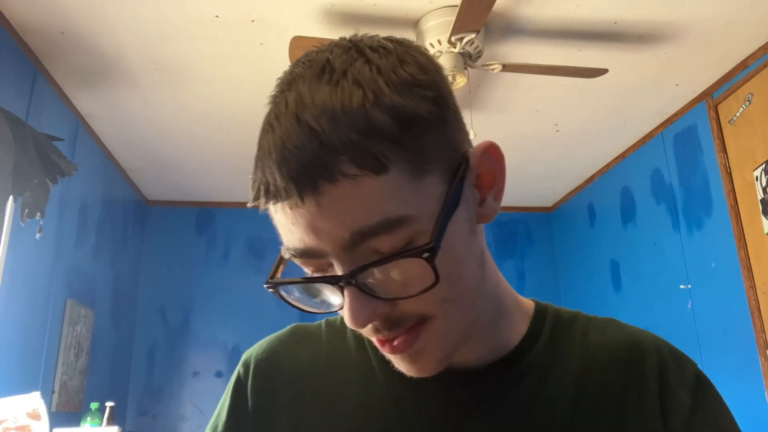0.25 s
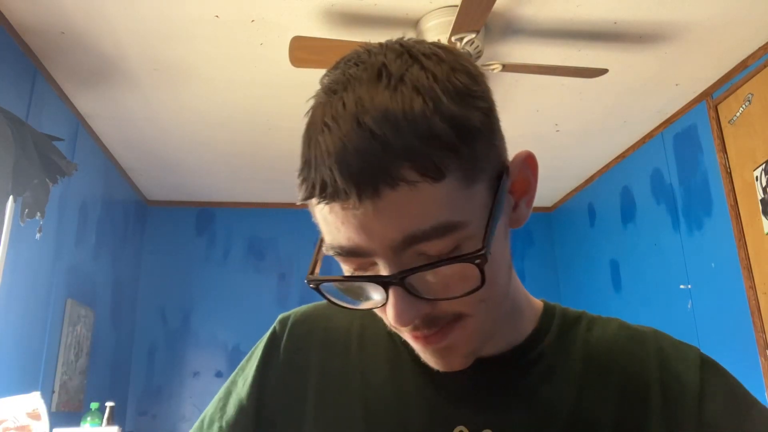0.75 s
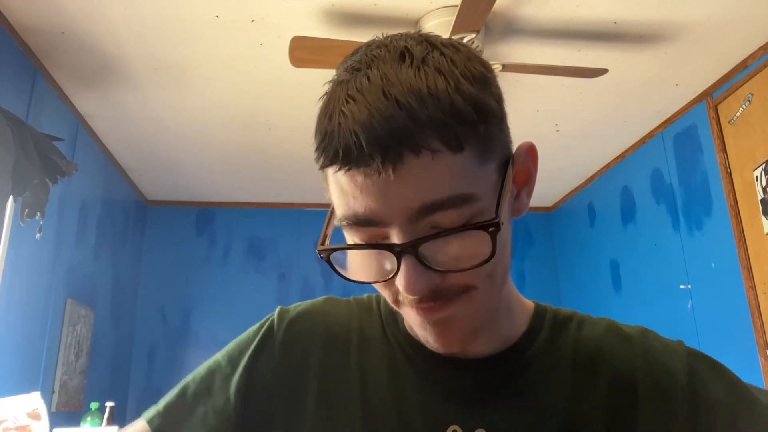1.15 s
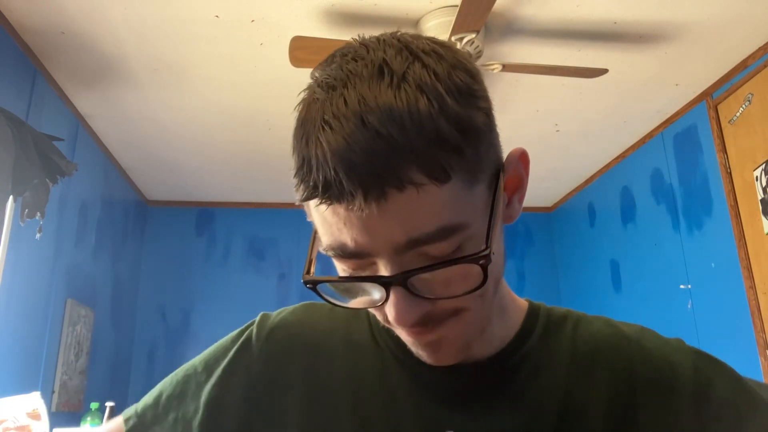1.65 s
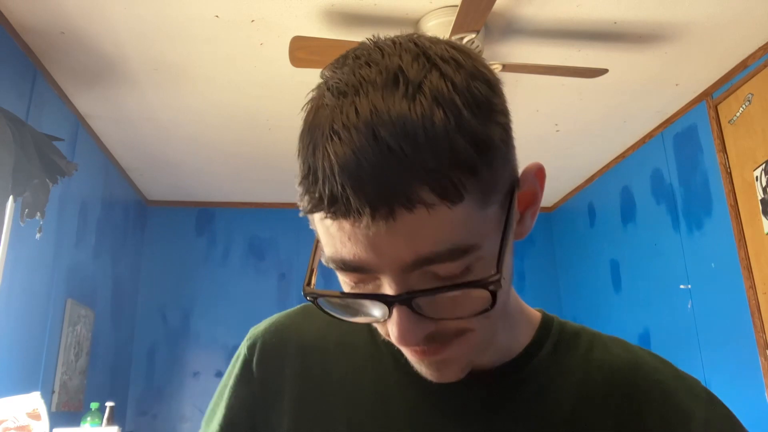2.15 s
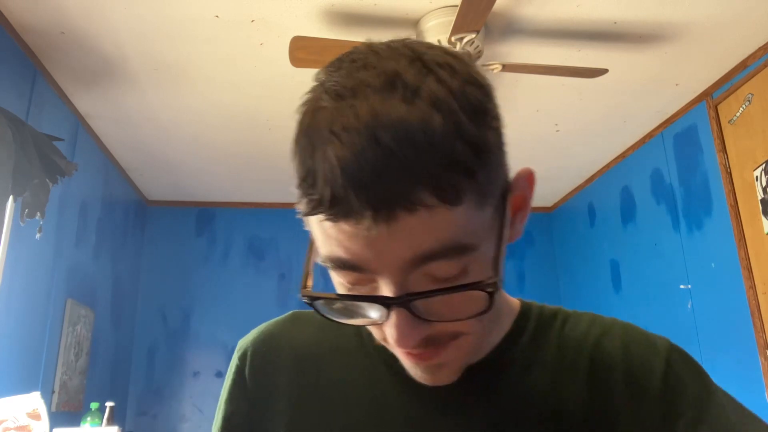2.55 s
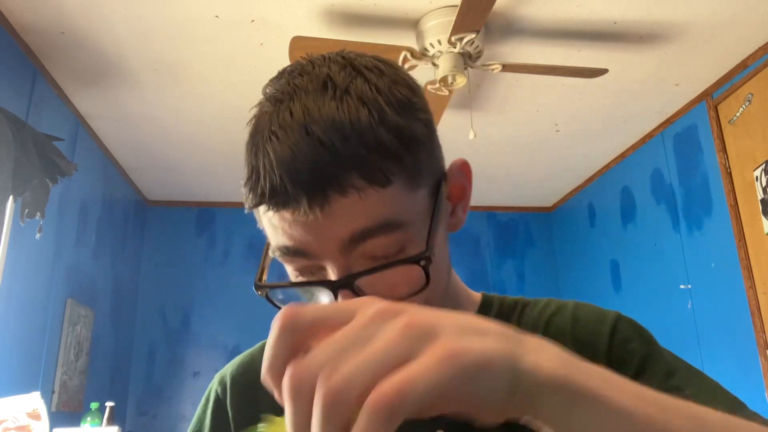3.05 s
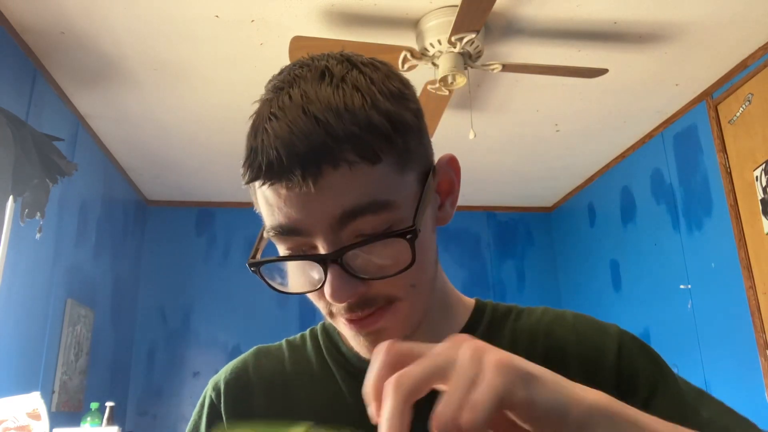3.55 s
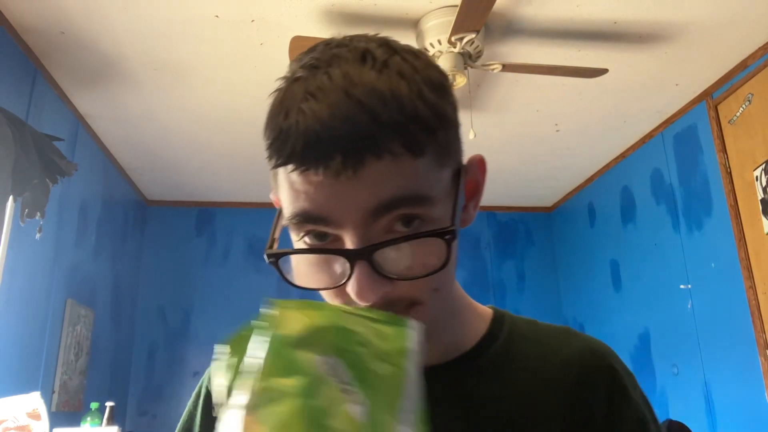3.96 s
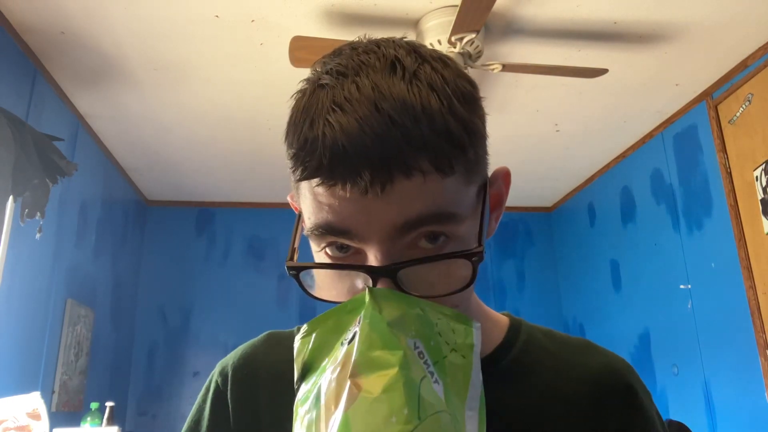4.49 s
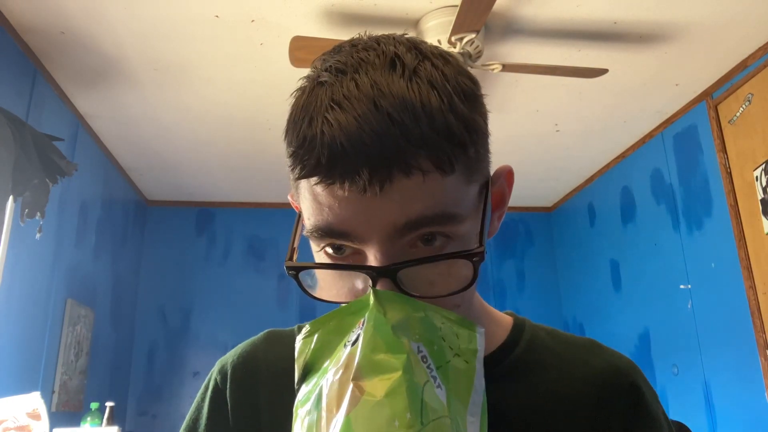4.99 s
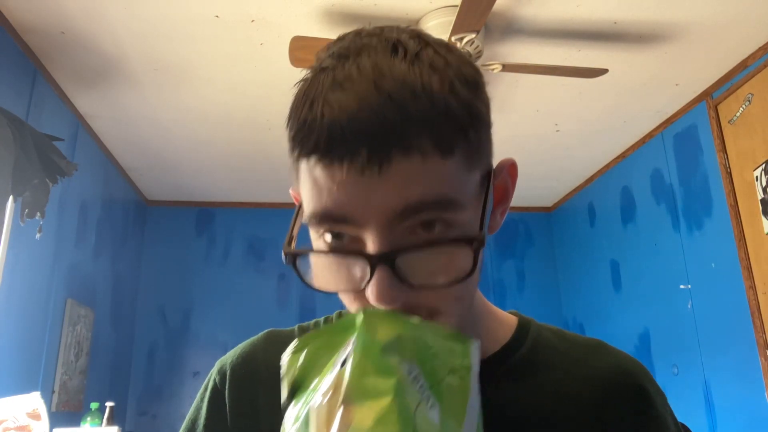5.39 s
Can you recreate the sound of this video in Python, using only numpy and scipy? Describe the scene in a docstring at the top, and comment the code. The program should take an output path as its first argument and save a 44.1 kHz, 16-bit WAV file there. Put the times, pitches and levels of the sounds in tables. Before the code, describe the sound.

Bright, loud plastic crinkling starts at once and comes in quick pulses, peaking before two seconds with snaps, rasps and a short run of peeling ticks. Softer, hollower rustles and low air puffs follow as the bag goes slack, then one last loud crunch and small clicks. The close pickup catches short room reflections; faint room air and a wavering low hum continue to the end.

```python
"""A low drone and faint air fill a small bedroom as a plastic snack bag is pulled taut close by.
From the first grip its stiff film crinkles in swarms of tiny clicks, and the room briefly rings.
Puffs of air, loud snaps with hollow pops, and rasps of slipping film soon join in.
Near one second the seam peels in runs of dry ticks; later the bag is turned over slack and lifted.
Random clicks are shaped by the film's spectrum; the puffs, air and rumble are filtered noise."""
import sys
import numpy as np
from scipy import signal
from scipy.fft import rfft, irfft
from scipy.io import wavfile
from scipy.ndimage import uniform_filter1d

SR = 44100
rng = np.random.default_rng(int(sys.argv[2]) if len(sys.argv) > 2 else 0)


def file_out(sig):
    """Save sig as 16-bit WAV at sys.argv[1]."""
    # one column per channel
    cols = np.atleast_2d(sig).T
    # limit, then scale
    lim = np.clip(cols, -1, 1)
    pcm = np.round(lim * 32767).astype(np.int16)
    wavfile.write(sys.argv[1], SR, pcm)


N = 248322
TIME = np.arange(N) / SR  # s
BINS = np.fft.rfftfreq(4096, 1 / SR)  # frequencies at which spectra are drawn, Hz


def amp(db):
    """Turns decibels into gain."""
    return 10 ** (np.asarray(db) / 20)


def unit_rms(x):
    """Scales a sound to rms 1."""
    return x / np.sqrt(np.mean(x ** 2) + 1e-20)


def unit_energy(x):
    """Scales a sound to energy 1."""
    return x / np.sqrt(np.sum(x ** 2) + 1e-20)


def read(points, hz):
    """Reads between the points of a table on a log-frequency axis."""
    f, value = np.transpose(points)
    return np.interp(np.log(hz + 1), np.log(f), value)


def add(mix, s, sound):
    """Mixes a sound in at time s, in seconds."""
    start = max(round(s * SR), 0)
    part = mix[start:][:len(sound)]
    part += sound[:len(part)]


def causal(db):
    """Makes the sharpest impulse response with this spectrum (minimum phase), of energy 1."""
    log_gain = np.log(amp(np.maximum(db, db.max() - 100)))
    circle = np.concatenate([log_gain, log_gain[-2:0:-1]])  # add the mirrored negative frequencies
    minimum_phase = np.exp(np.conj(signal.hilbert(circle)))
    return unit_energy(np.fft.ifft(minimum_phase).real[:len(BINS)])


def bump(hz, width, lift_db):
    """Draws one resonance as a lift in dB."""
    return lift_db / (1 + (2 * (BINS - hz) / width) ** 2)


def band(low_hz, high_hz, order=3):
    """Draws a pass band in dB."""
    below = 1 + (low_hz / (BINS + 1)) ** (2 * order)
    above = 1 + (BINS / high_hz) ** (2 * order)
    return -10 * np.log10(below * above)


def background(drone_hz=71, waver_hz=4, rumble_db=-6, air_db=-59):
    """Filtered noise makes faint, even room air; a wavering sine in a little rumble makes the drone."""
    # still room air: (f/Hz, relative level/dB)
    air_colour = [(25, -18), (45, -4.5), (75, -10), (125, -8.5), (190, -22), (350, -16.5), (520, -26.5),
                  (1230, -29), (1600, -33), (4300, -40), (5100, -31.5), (6100, -41.5), (8200, -43.5),
                  (10800, -41), (13500, -46), (16000, -45.5)]
    # the drone's rise and fall: (t/s, level/dB)
    drone_levels = [(0, -46.5), (2.4, -53), (3.3, -54), (3.9, -49.5), (4.5, -47.5), (4.85, -58), (5.1, -51),
                    (5.3, -46.5), (5.63, -45.5)]
    hz = np.fft.rfftfreq(N, 1 / SR)
    air = rfft(rng.standard_normal(N)) * amp(read(air_colour, hz))
    air = irfft(air, N) / np.std(irfft(air * (hz > 200), N))  # air_db is its level above 200 Hz

    waver = unit_rms(irfft(rfft(rng.standard_normal(N)) * (hz < 8), N))
    pitch = drone_hz + waver_hz * waver
    tone = unit_rms(np.sin(2 * np.pi * np.cumsum(pitch) / SR))
    rumble = rfft(rng.standard_normal(N)) / (1 + ((hz - drone_hz) / 15) ** 4)
    drone = unit_rms(tone + amp(rumble_db) * unit_rms(irfft(rumble, N)))
    drone_db = np.interp(TIME, *np.transpose(drone_levels))
    return amp(air_db) * air + amp(drone_db) * drone


def hands(t, rest_db=-81, release_db_per_s=211.5, release_per_taut_db=0.43, flap_db=-6,
          flap_per_taut_db=-0.52):
    """Gives levels in dB of creases, panels and wall as each grip tightens, holds and lets go."""
    # pulls and squeezes, crisp if taut and hollow if slack:
    # (start t/s, rise/s, hold/s, panel level/dB, tautness/dB)
    grips = [(0.0, 0.0017, 0.033, -27.5, 0), (0.046, 0.025, 0.053, -37.5, 2),
             (0.169, 0.065, 0.058, -34, 2.5), (0.251, 0.068, 0.063, -22.5, 4),
             (0.376, 0.021, 0.062, -22.5, 2), (0.483, 0.042, 0.047, -27.5, 2),
             (0.612, 0.021, 0.044, -25.5, 1.5), (0.704, 0.042, 0.081, -23, 5),
             (0.833, 0.029, 0.034, -21, 4.5), (0.926, 0.04, 0.027, -23, 4), (1.027, 0.014, 0.03, -28.5, 4),
             (1.1, 0.028, 0.046, -28.5, 5), (1.207, .012, 0.04, -24, 6), (1.283, 0.1, 0.016, -19, 6),
             (1.383, 0.041, .04, -22.5, 10.5), (1.472, 0.024, 0.078, -24.5, 6.5),
             (1.575, 0.027, 0.047, -19, 4.5), (1.738, 0.047, 0.027, -20, 6.5),
             (1.801, 0.015, 0.0075, -16.5, -2), (1.934, 0.036, 0.038, -31, -0.5),
             (2.055, 0.024, 0.068, -32.5, -3), (2.245, 0.018, 0.016, -41.5, -8),
             (2.439, 0.029, 0.041, -39, -4), (2.498, 0.023, 0.06, -27, -2), (2.79, 0.023, 0.022, -43, -6.5),
             (2.869, 0.034, 0.12, -43, 0.5), (3.017, 0.035, 0.039, -34.5, -4),
             (3.226, .015, 0.046, -51.5, 1.5), (3.375, 0.019, 0.07, -35, -5),
             (3.466, 0.024, 0.022, -18.5, -0.5), (3.575, 0.021, 0.02, -49, 1),
             (3.758, 0.012, 0.015, -35, -5), (3.84, 0.022, 0.099, -53.5, 2.5), (4, 0.02, 0.028, -53.5, -2),
             (4.195, 0.035, 0.021, -45, -2.5), (4.875, .012, 0.013, -57, -4), (4.955, .02, .03, -61.5, -2)]
    power = amp(rest_db) ** 2  # the bag held still
    for start, rise, hold, db, taut in grips:
        tighten = np.clip((t - start) / rise, 0, 1)
        # taut film stops at once, slack film goes on settling
        fall_db_per_s = release_db_per_s * amp(release_per_taut_db * taut)
        let_go = amp(-fall_db_per_s * np.maximum(t - start - rise - hold, 0))
        wall_db = db + flap_db + flap_per_taut_db * taut  # the wall flaps less the tauter it is
        shares = amp([db + taut, db, wall_db])
        power = power + np.outer(shares, tighten * let_go) ** 2
    return 10 * np.log10(power)


def bag_voices(ring=1, flap_hz=520, crease_hz=3400, lowest_hz=200):
    """Gives spectra of small creases, middling panels and the whole flapping wall."""
    # colour of the film: (f/Hz, relative level/dB)
    film_colour = [(60, -4.5), (150, -0.5), (210, -8), (300, 1.5), (520, 3.5), (720, -1.5), (1500, -2),
                   (2100, -2.5), (3800, 3.5), (5200, 2.5), (7000, 2.5), (9700, 4.5), (11200, -0.5),
                   (13400, -7), (15500, -3)]
    # resonances of the hollow bag: (f/Hz, width/Hz, lift before the ring factor/dB)
    hollow_modes = [(386, 53, 2.5), (951, 150, 10), (1275, 80, 4), (1660, 160, 0), (2450, 120, -0.5)]
    colour = read(film_colour, BINS) + ring * sum(bump(*mode) for mode in hollow_modes)
    crease = colour + band(crease_hz, SR)
    panel = colour + band(flap_hz, crease_hz)
    wall = colour + band(lowest_hz, flap_hz)
    return [crease, panel, wall]


def facet(spread_db, size=110):
    """Gives one facet of film its own chance peaks and dips, smoothed over size bins."""
    noise = rng.standard_normal(len(BINS) + size - 1)
    ripple = signal.fftconvolve(noise, np.hanning(size), "valid")
    return spread_db * unit_rms(ripple)


def swarm_of_clicks(t, per_s, spread_db, facet_db, count=24):
    """Makes uneven clicks; a fold travels, so neighbouring clicks come from neighbouring facets."""
    loudness = amp(spread_db * np.minimum(rng.exponential(1, len(t)), 3))
    sizes = loudness * rng.choice([-1, 1], len(t))
    clicks = sizes * (rng.random(len(t)) < per_s / SR)
    # the fold crosses 110 facets a second, with some scatter
    which = (t * 110 + rng.uniform(0, 6, len(t))).astype(int) % count
    swarm = np.zeros(len(t))
    for k in range(count):
        swarm += signal.oaconvolve(clicks * (which == k), causal(facet(facet_db)))[:len(t)]
    return unit_rms(swarm)


def buckling(t, per_s, spread_db, slide, slips_per_s=190, slip_s=0.00043, clump=0.43):
    """Bunches clicks and sliding hiss: tension builds, the film slips, and tension builds again."""
    swarm = swarm_of_clicks(t, per_s, spread_db, facet_db=4.5) + slide * rng.standard_normal(len(t))
    wait, size = rng.uniform(.25, 1.75, (len(t) // 20, 2)).T
    at = (np.cumsum(wait) / slips_per_s * SR).astype(int)
    slips = np.bincount(at, size, len(t))[:len(t)]
    fading_slips = signal.lfilter([1], [1, -np.exp(-1 / (slip_s * SR))], slips)
    swarm = swarm * (1 + clump * fading_slips)
    return swarm / np.sqrt(uniform_filter1d(swarm ** 2, size=1000))  # the hand feeds in energy steadily


def crinkle(per_s=1500, idle_per_s=900, trims_db=(0, -.6, -.3)):
    """Makes more creases give way each second the harder the hands work."""
    coarse = TIME[::40]
    levels = [np.interp(TIME, coarse, level) for level in hands(coarse)]
    rate = idle_per_s + per_s * amp(.8 * (levels[0] + 20))
    swarm = buckling(TIME, rate, spread_db=2.5, slide=0.26)
    out = 0
    for db, trim, colour in zip(levels, trims_db, bag_voices()):
        out = out + signal.oaconvolve(swarm * amp(db + trim), causal(colour))
    return out


def echoes(near_db=-13, tail_db=-7.5):
    """Makes a few reflections from body and desk, then a diffuse tail that dies fastest at the top."""
    # room decay: (f/Hz, time to fall 60 dB/s)
    room_decay = [(150, 0.58), (600, 0.26), (1800, 0.36), (5000, 0.34), (10000, 0.27), (16000, 0.043)]
    t = np.arange(SR // 2) / SR
    near = np.zeros(len(t))
    near[(rng.uniform(.002, .014, 9) * SR).astype(int)] = rng.choice([-1, 1], 9)

    hz, when, z = signal.stft(rng.standard_normal(len(t)), SR, nperseg=256)
    decay = amp(-60 * when / read(room_decay, hz)[:, None])
    tail = signal.istft(z * decay, SR, nperseg=256)[1][:len(t)]
    tail = unit_energy(tail * np.clip((t - .003) / 0.0009, 0, 1))  # starts after 3 ms
    return amp(near_db) * unit_energy(near) + amp(tail_db) * tail


def bedroom(x, boom_hz=157, boom_width_hz=10, count=8):
    """Shifts the echo pattern as the bag moves; one standing wave booms between the walls."""
    place = TIME * 30  # 30 steps a second round the ring of echo patterns
    wet = np.zeros(N)
    for k in range(count):
        away = np.minimum(abs((place - k + count / 2) % count - count / 2), 1)
        crossfade = np.cos(np.pi / 2 * away)
        wet += signal.fftconvolve(x * crossfade, echoes())[:N]
    boom = signal.lfilter(*signal.iirpeak(boom_hz, boom_hz / boom_width_hz, SR), x)
    return x + wet + boom


def swell(drive, colour):
    """Passes a drive through a spectrum, rising and falling once."""
    rung = signal.fftconvolve(drive, causal(colour))[:len(drive)]
    return unit_rms(rung) * signal.windows.tukey(len(drive), .6)


def puffs(low_hz=55, high_hz=125):
    """Pushes out air as the wall collapses: short swells of low noise."""
    # puffs as the bag gives way: (t/s, length/s, level before fading in and out/dB)
    puff_table = [(0.04, 0.098, -34), (1.59, 0.054, -38.5), (1.80, 0.071, -35), (2.11, 0.055, -39),
                  (2.52, 0.054, -36), (2.89, 0.12, -45.5), (3.04, 0.076, -40.5), (3.395, 0.074, -39.5),
                  (3.483, 0.048, -32)]
    out = np.zeros(N)
    for s, length, db in puff_table:
        air = rng.standard_normal(round(length * SR))
        add(out, s, amp(db) * swell(air, band(low_hz, high_hz)))
    return out


def small_snaps(shift_db=-4, spread_db=4, loudest_db=-23, low_hz=950, high_hz=2600, count=120):
    """Flips lesser creases at chance moments, about as loud as the crinkle around them."""
    chance = rng.random((count, 5))
    s = (np.arange(count) + chance[:, 0]) / count * TIME[-1]
    levels = np.minimum(hands(s).T + shift_db, loudest_db)
    levels = levels + spread_db * (2 * chance[:, 2:] - 1)
    pitches = low_hz * (high_hz / low_hz) ** chance[:, 1]
    return list(zip(s, *levels.T, pitches))


def aftershocks(decay_s, main, count=110):
    """Makes a main click, 0.5 ms in, amid the fading run of clicks in the film around it."""
    burst = np.zeros(SR // 30)
    late = rng.uniform(0, 4, count)
    at = np.minimum(late * decay_s * SR, len(burst) - 1).astype(int)
    burst[at] = rng.choice([-1, 1], count) * np.exp(-late)
    burst = unit_energy(burst)
    burst[SR // 2000] += main
    return burst


def snaps(thud_trim_db=-1, tick_hz=5500, pop_width=0.28, pop_lift_db=3.5):
    """Flips a crease with a bright tick; its panel pops at its own pitch, and the bag wall thuds."""
    # single creases snapping through, levels over 10 ms:
    # (t/s, tick level/dB, panel pop level/dB, wall thud level before its trim/dB, panel pitch f/Hz)
    snap_table = [(0.072, -17.5, -25.5, -32, 1500), (0.1516, -24, -31.5, -49, 1040),
                  (0.1548, -24.5, -29, -36.5, 1050), (0.4017, -20.5, -19.5, -34, 1510),
                  (0.5952, -21, -23, -31.5, 1820), (0.6296, -26, -28.5, -31, 1400),
                  (0.7601, -16.5, -24, -21, 1590), (0.789, -31, -23.5, -42, 1390),
                  (0.9357, -16, -20.5, -32, 1740), (0.9524, -19, -24.5, -24, 2030),
                  (1.0383, -25, -28, -48, 1520), (1.1128, -24, -32, -35, 1500),
                  (1.2135, -18.5, -21.5, -37, 1100), (1.3054, -24, -31, -40.5, 1750),
                  (1.5682, -15, -16.5, -25.5, 1220), (1.6128, -31, -16, -23.5, 1160),
                  (1.7596, -19.5, -37, -33, 2160), (1.8473, -20, -18.5, -24.5, 1030),
                  (1.9136, -25, -47, -54, 1560), (1.9216, -23.5, -26, -55, 1900),
                  (2.0203, -25.5, -45, -34, 1660), (2.1273, -22.5, -31.5, -32.5, 1190),
                  (2.1313, -20, -32, -27, 1540), (2.263, -35, -32.5, -33.5, 1020),
                  (2.4128, -53, -43, -41, 1380), (2.5149, -30, -27, -27, 1040),
                  (2.5426, -23.5, -21.5, -41, 1440), (2.594, -21.5, -21, -27.5, 1230),
                  (2.7155, -34.5, -38, -54, 1300), (2.7555, -44, -39.5, -39, 990),
                  (2.789, -36.5, -30.5, -32, 1060), (2.9037, -38, -33.5, -33, 1410),
                  (2.9794, -42.5, -35, -35, 1070), (3.0311, -53, -35.5, -30, 885),
                  (3.061, -33, -33, -38, 920), (3.0871, -27, -24, -30, 1810),
                  (3.1717, -47, -36, -43.5, 1160), (3.3074, -61, -40, -68, 1470),
                  (3.3817, -40, -40, -58, 1220), (3.3943, -33.5, -33.5, -38, 900),
                  (3.4164, -23.5, -25.5, -31, 1310), (3.4595, -21, -20, -34, 1590),
                  (3.4801, -22, -19.5, -28, 1440), (3.5378, -32, -19, -28, 1030),
                  (3.6407, -36, -29.5, -50, 1040), (3.6892, -57, -27, -39, 940),
                  (3.7492, -58, -36.5, -46, 1080), (3.8581, -41, -39, -53, 1580),
                  (3.9296, -41, -36, -52, 2240), (4.0172, -56, -43, -41, 1400),
                  (4.0316, -51, -41, -47.5, 1450), (4.0616, -49, -34, -50, 1230),
                  (4.1105, -62, -47, -55, 1005), (4.199, -42.5, -56, -62, 1870),
                  (4.2213, -33.5, -39, -67, 1500), (4.2264, -35.5, -32, -50, 1300),
                  (4.2392, -53, -36.5, -42, 1200), (4.3237, -32, -47, -60, 2646),
                  (5.4991, -63.5, -62, -63, 1353)]
    out = np.zeros(N)
    crease, panel, wall = bag_voices(ring=0.93)
    for s, tick, pop, thud, hz in list(snap_table) + small_snaps():
        # the resonance width is a share of the pitch
        pitch = bump(hz, pop_width * hz, pop_lift_db) + band(hz / 2.5, hz * 1.68, order=2)
        bright = crease + facet(0.53) + band(tick_hz, SR, order=1)
        parts = [(tick, bright, aftershocks(decay_s=.003, main=0.17)),
                 (pop, panel + pitch, aftershocks(decay_s=.0032, main=0.33)),
                 (thud + thud_trim_db, wall, aftershocks(decay_s=.005, main=0.58))]
        for db, colour, burst in parts:
            add(out, s, amp(db) * unit_energy(signal.fftconvolve(burst, causal(colour))))
    return out * np.sqrt(SR / 100)  # energy 1 becomes rms 1 over 10 ms


def rasps():
    """Rings a stretched panel with the rapid slips of taut film."""
    # taut film rasping: (t/s, length/s, pitch f/Hz, width/Hz, level before fading in and out/dB)
    rasp_table = [(0.31, .04, 7370, 450, -25.5), (0.429, .046, 2080, 1600, -21.5),
                  (0.847, 0.51, 3330, 1103, -34), (1.312, 0.057, 8150, 1500, -22),
                  (1.394, .155, 2570, 1000, -22)]
    out = np.zeros(N)
    for s, length, hz, width, db in rasp_table:
        slips = buckling(np.arange(0, length, 1 / SR), per_s=4200, spread_db=1.5, slide=.3)
        resonance = -20 * np.log10(1 + (2 * (BINS - hz) / width) ** 2)
        add(out, s, amp(db) * swell(slips, resonance))
    return out


def peeling(jitter=0.17, spread_db=2, panel_db=-5, tick_hz=8000):
    """Makes each slip of the seam one dry tick that also rings the hollow bag."""
    # runs of quick, separate slips: (start t/s, length/s, slips per second f/Hz, level before ringing/dB)
    peel_runs = [(0.985, .055, 105, -25.5), (1.057, .035, 150, -24.5), (1.111, .06, 160, -24),
                 (1.18, .03, 88, -29.5)]
    slips = np.zeros(N)
    for start, length, per_s, db in peel_runs:
        waits, sizes = rng.uniform(-1.1, 1, (round(length * per_s) + 1, 2)).T
        steps = (1 + jitter * waits) / per_s
        times = start + np.cumsum(steps) - steps[0]
        for s, size in zip(times, sizes):
            level = amp(db + spread_db * size) * np.sqrt(SR / per_s)
            add(slips, s, level * aftershocks(decay_s=.0008, main=0.34))
    crease, panel, _ = bag_voices(ring=2.1)
    ring = causal(crease + band(tick_hz, SR, order=2)) + amp(panel_db) * causal(panel)
    return signal.fftconvolve(slips, ring)[:N]


def scene():
    """Puts all the bag's sounds in the room, over the drone and air."""
    bag = puffs() + snaps() + rasps() + peeling()
    add(bag, 0, crinkle())
    return (bedroom(bag) + background())[None]


def record(dry, low_cut_hz=36, cutoff_hz=16000):
    """Sheds deep bass at the microphone, rounds off the tallest peaks, then limits the band."""
    high_pass = signal.butter(3, low_cut_hz, "high", fs=SR, output="sos")
    thinned = signal.sosfilt(high_pass, dry)
    rounded = .9 * np.tanh(thinned / .9)
    low_pass = signal.firwin(401, cutoff_hz, window=("kaiser", 9), fs=SR)
    return signal.oaconvolve(rounded, low_pass[None], "same")


dry = scene()
out = record(dry)
file_out(out)
```